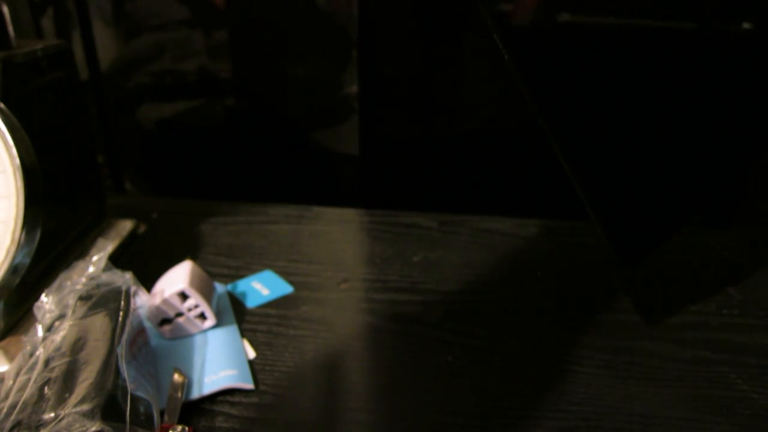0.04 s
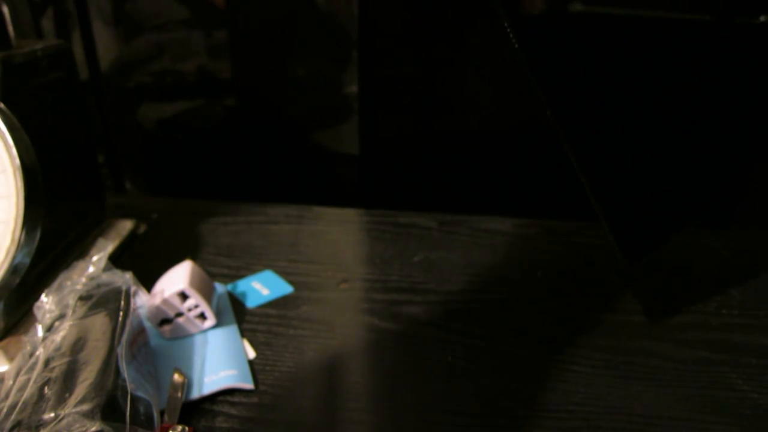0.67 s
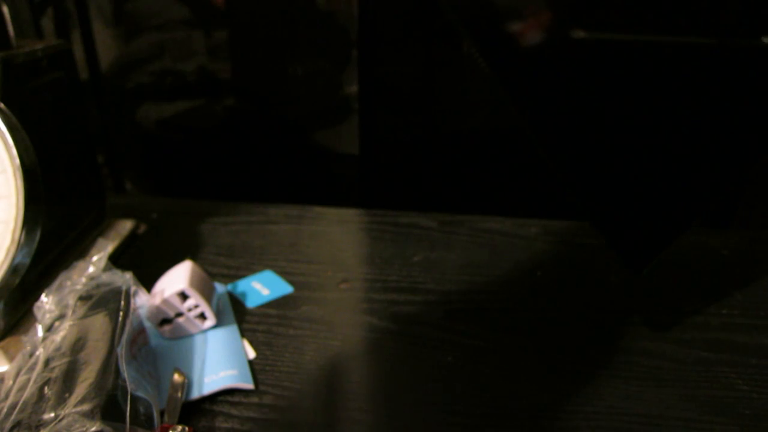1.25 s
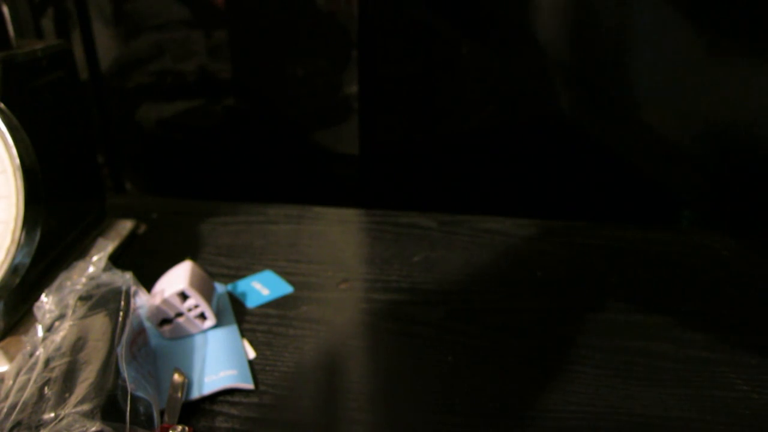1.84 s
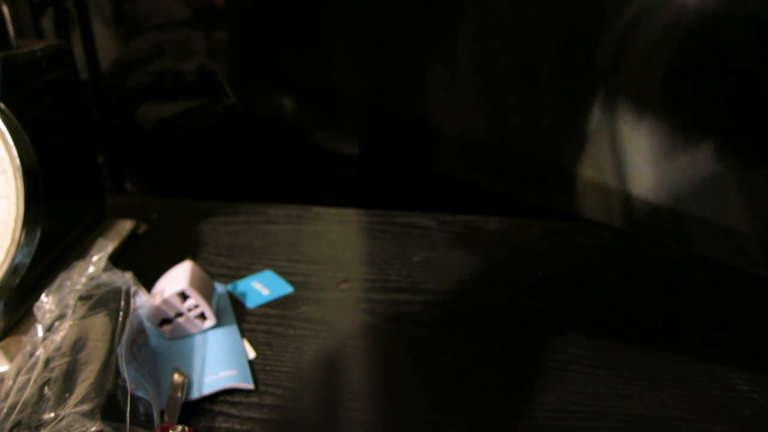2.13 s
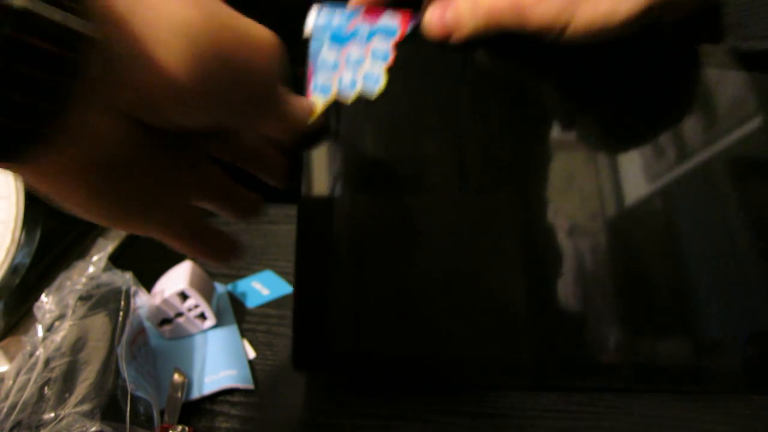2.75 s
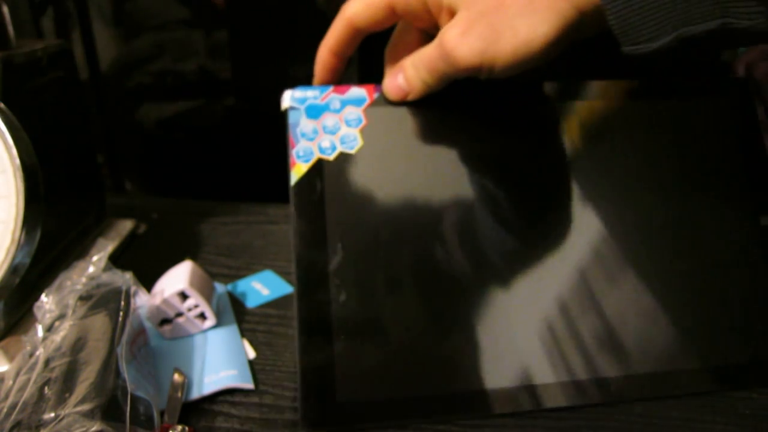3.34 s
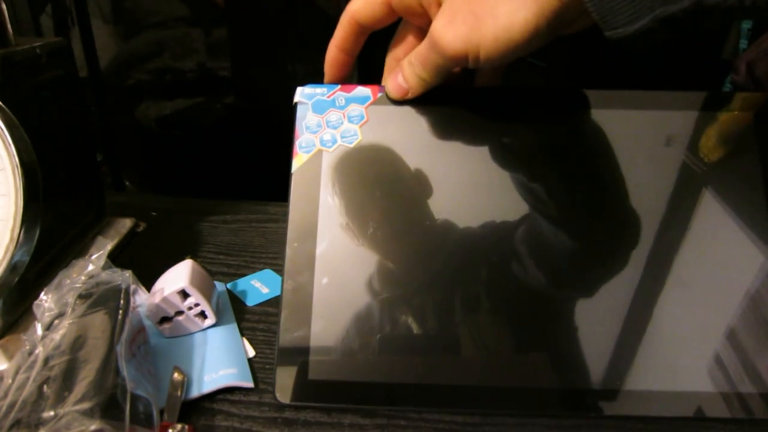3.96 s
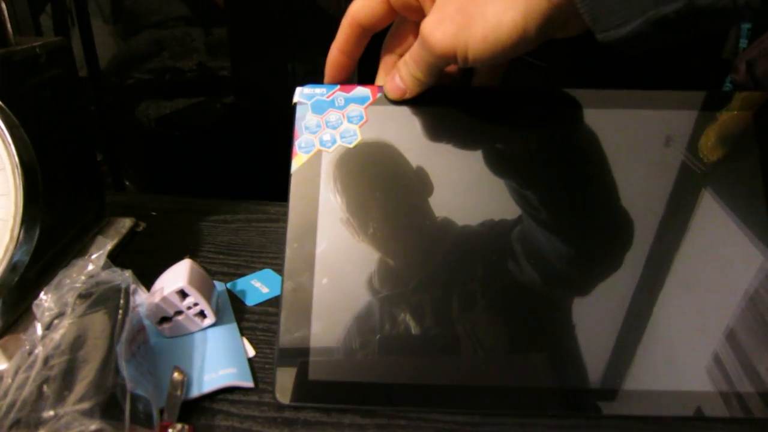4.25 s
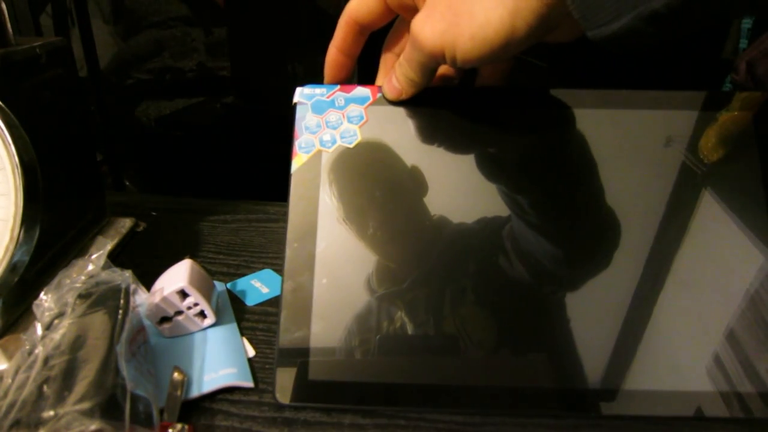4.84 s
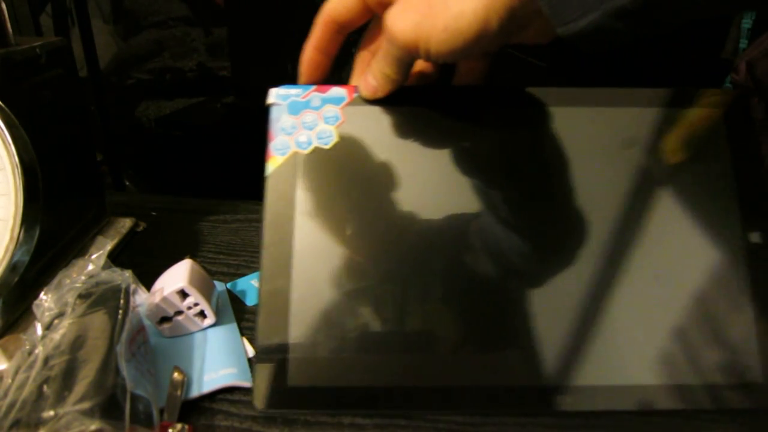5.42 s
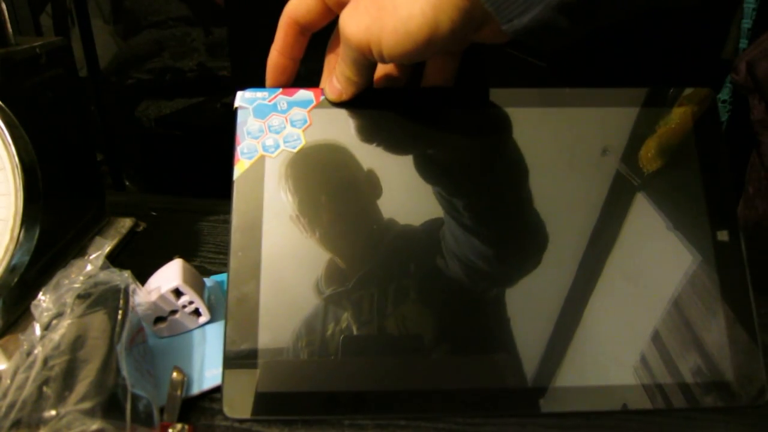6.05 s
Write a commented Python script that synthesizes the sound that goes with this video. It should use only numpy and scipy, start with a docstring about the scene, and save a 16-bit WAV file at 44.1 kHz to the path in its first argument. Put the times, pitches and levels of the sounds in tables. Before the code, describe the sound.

A tablet knocks down heavily on a wooden table, then is rocked and dragged with clacks and short scrapes in a quiet room.

```python
"""A tablet knocks down heavily on its edge on a wooden table, is dragged round and rocked, then slid again.
Each knock thuds in the table top and clacks in the shell; the heavy ones set small loose metal clinking. The
sliding edge sticks and slips on the grain, so the shell scrapes, the wood rumbles and grit hisses. Fingers tick
and rub on the shell and a sleeve brushes past, all close up in a small, quiet room."""
import sys
import numpy as np
from scipy import signal
from scipy.fft import rfft, irfft, next_fast_len
from scipy.io import wavfile
from scipy.ndimage import map_coordinates

SR = 44100
rng = np.random.default_rng(int(sys.argv[2]) if len(sys.argv) > 2 else 0)


def bounce(signal):
    """Save signal as a 16-bit WAV file at the path given by the first command-line argument."""
    frames = np.transpose(np.atleast_2d(signal))
    limited = np.clip(frames, -1, 1)
    pcm = np.round(limited * 32767).astype(np.int16)
    wavfile.write(sys.argv[1], SR, pcm)


N = 268569
RING = np.arange(SR // 2) / SR  # seconds after a contact

# The table top's modes. Each row: frequency in Hz, level in dB, ring time (t60) in seconds.
WOOD_MODES = [(113.4, -3, 0.32), (146, -.5, 0.21), (188, -5.5, 0.32), (237.3, -3.5, 0.21), (270, -7, 0.19),
              (306.6, -7.5, 0.2), (344.8, -5.5, 0.25), (374.2, -6, 0.21), (456, -24, 0.44),
              (514, -13.5, 0.052), (530, -2.5, 0.19), (654, -5, 0.061), (689, -6, 0.19), (837, -11.5, 0.27)]
# The tone of the struck shell. Each row: frequency in Hz, level in dB.
CLACK_EQ = [(200, -3), (500, 2.5), (850, 2), (1250, -2), (1650, -9), (1860, -2), (2500, -12), (3200, -23),
            (6000, -44), (16000, -60)]
# The stereo image of close sounds. Each row: frequency in Hz, left-right likeness (1 is mono).
CLOSE_IMAGE = [(150, 0.98), (600, 1), (1200, 0.96), (2400, 0.93), (4000, 0.83), (8000, 0.78), (13000, 0.23)]


def knocks():
    """The edge knocks the table, landing or catching as it is dragged, and the wood thuds; harder knocks add
    more tock, shell clack and buzzing crack."""
    # Each row: start in seconds, thud level in dB, thud centre in Hz, hardness (clack over thud) in dB.
    blows = [(2.732, -10.5, 159, -17), (2.914, -10, 219, -12), (2.928, -9.5, 127, -26),
             (3.134, -25.5, 249, -12), (3.218, -29.5, 233, -11), (3.345, -32, 280, -16),
             (3.4, -20, 512, -2.5), (3.449, -15.5, 484, -15), (3.546, -20.5, 162, -21),
             (3.557, -21.5, 540, -11.5), (3.581, -26, 539, -12), (3.687, -23.5, 350, -8.5),
             (3.708, -20.5, 362, -0.5), (3.74, -19.5, 545, -9), (3.925, -18.5, 282, -16),
             (4.141, -24, 244, -21), (4.166, -35.5, 243, -26), (4.319, -23, 258, -16.5),
             (4.485, -35.5, 258, -17), (5.097, -41, 137, -27), (5.298, -32, 148, -15.5),
             (5.425, -22.5, 515, -9), (5.461, -21.5, 391, -12.5), (5.502, -26, 490, -10),
             (5.599, -36.5, 136, -14), (5.907, -35.5, 280, -15.5)]
    # The tones of the woody tock and the edge's crack. Each row: frequency in Hz, level in dB.
    tock_eq = [(120, -26), (250, -21), (370, 11.5), (520, -6.5), (700, -6), (900, -17), (1300, -12.5),
               (4000, -49)]
    crack_eq = [(500, 0), (2500, 17), (4000, 3.5), (5200, 9.5), (7000, -5), (11000, -13.5), (16000, -28)]
    out = np.zeros((2, N))
    for start, db, centre_hz, hard_db in blows:
        wood = thud(centre_hz)
        tock = burst(tock_eq, attack=0.0033, t60=0.043, tail_db=-17, tail_t60=0.31)
        clack = burst(CLACK_EQ, attack=0.00068, t60=0.17, tail_db=-0.5, tail_t60=0.46)
        crack = click(crack_eq)
        buzz = amp(-2) * burst(crack_eq, attack=0.0007, t60=0.052, tail_db=1, tail_t60=0.29)
        tock_db, crack_db = -0.5 + 0.61 * hard_db, -8 + 1.3 * hard_db
        hit = wood + amp(tock_db) * tock + amp(hard_db) * clack + amp(crack_db) * (crack + buzz)
        add(out, start, amp(db) * hit)
    return out


def thud(centre_hz):
    """The table top gives under the blow and rings in the modes around the contact's own pitch."""
    reach_octaves, scatter_db, attack_s, settle_s = 0.78, 3.5, 0.0008, 0.33
    hz, db, t60 = np.transpose(WOOD_MODES)[:, :, None]
    reach = 1 / np.sqrt(1 + (np.log2(hz / centre_hz) / reach_octaves) ** 2)
    reach += amp(-12) * (hz[0] / hz) ** 5  # every blow also rocks the top in its lowest modes
    polarity = (-1) ** np.arange(len(hz))[:, None]
    gains = polarity * reach * amp(db + scatter_db * rng.standard_normal(hz.shape))
    ring = np.sum(gains * decay(t60) * np.sin(2 * np.pi * hz * RING), axis=0)
    damping = 1 - 0.23 * (1 - np.exp(-(RING / settle_s) ** 2))  # the resting edge soaks up some ring
    punch = amp(8) * decay(t60=0.1) * np.sin(2 * np.pi * centre_hz * RING)
    return unit_hit((ring * damping + punch) * (1 - np.exp(-RING / attack_s)))


def drags():
    """The sliding edge shakes the shell and the table; grit hisses at the contact."""
    # The modes of the shell and glass. Each row: frequency in Hz, width in Hz, level in dB.
    shell_modes = [(374, 110, -8), (454, 67, 3), (509, 101, 1), (635, 10.4, -0.5), (772, 20, -13),
                   (929, 61, -8.5), (1100, 45, -18.5), (1213, 50, -13.5), (1375, 35, -10),
                   (1534, 48, -12.5), (1843, 107, -10), (2080, 36, -18.5), (2185, 14, -12.5),
                   (2430, 13, -8), (2487, 95, -20.5), (3590, 24, -25), (4190, 20.6, -28), (5200, 69, -22.5),
                   (5700, 53, -27)]
    # The tone of the grit. Each row: frequency in Hz, level in dB.
    grit_eq = [(1650, -15), (2800, -6), (5440, -7.5), (5890, -9.5), (6970, -9), (9820, -13), (11300, -11.5),
               (14700, -25), (16000, -45)]
    pressed_modes = [(hz, 5 / t60, db) for hz, db, t60 in WOOD_MODES]  # the edge damps and widens them

    def shell_response(f):
        """The small shell resonates but radiates no bass."""
        return resonances(shell_modes, f) / np.sqrt(1 + (300 / (f + 1)) ** 6)

    def wood_response(f):
        """The pressed top resonates, rolled off below 110 Hz and above 250 Hz."""
        return resonances(pressed_modes, f) * 1j * f / (110 + 1j * f) / (1 + 1j * f / 250)

    ridges = unit(amp(1.9 * wobble(rate=90)))  # chatter over the wood grain
    friction = ridges * stick_slip(rate=1400, smooth=0.96)
    dust = stick_slip(rate=650, smooth=1.0)  # single specks under the edge
    scrape = unit(filtered(friction, shell_response))
    rumble = unit(filtered(friction, wood_response))
    grit = unit(equalised(friction + 0.65 * dust, grit_eq))
    scrape_gain, rumble_gain, grit_gain = push_envelopes()
    return scrape_gain * scrape + rumble_gain * rumble + grit_gain * grit


def push_envelopes():
    """Scrape, rumble and grit swell with each push's speed; rumble holds up best as the edge slows."""
    # Each row: start in seconds, speeding up in seconds, slowing down in seconds, peak scrape in dB,
    # then rumble and grit in dB relative to that peak.
    pushes = [(3.124, 0.021, 0.17, -40.5, 9.5, -11), (3.4, .018, .19, -28.5, -6.5, -14),
              (3.531, 0.044, 0.082, -25, -10, -21.5), (3.6, 0.056, 0.064, -31.5, -9, -13),
              (3.704, 0.03, 0.078, -18.5, -3, -15), (5.2, 0.18, 0.18, -39, -3, -18),
              (5.39, 0.092, 0.25, -26.5, -15, -14)]
    swell_db, roundness = 26, 1.48
    gains = np.zeros((3, N))
    for start, rise, fall, db, rumble_db, grit_db in pushes:
        t = np.arange(N) / SR - start
        from_peak = np.interp(t, [0, rise, rise + fall], [0.44, 0, 1])  # the edge breaks loose at speed
        speed_db = -swell_db * from_peak ** roundness
        levels = db + np.array([speed_db, rumble_db + 0.55 * speed_db, grit_db + 0.85 * speed_db])
        gains = np.maximum(gains, amp(levels) * gate(t, rise + fall, attack=0.0035, release=0.0088))
    return gains


def stick_slip(rate, smooth):
    """Tiny uneven jerks at random moments, about rate a second, over a bed of smooth friction."""
    jerks = (rng.random(N) < rate / SR) * rng.standard_normal((2, N))
    bed = smooth * rng.standard_normal((2, N))
    return unit(stereo(unit(jerks) + bed, CLOSE_IMAGE))


def taps():
    """Light contacts move only the shell; a nail snaps brighter than a fingertip, then scuffs."""
    # Each row: start in seconds, clack level in dB, snap level in dB, snap tilt in dB per octave.
    touches = [(0.025, -42.5, -44.5, -0.5), (1.570, -40, -43, 5), (1.591, -42.5, -46, 21),
               (1.617, -50, -44.5, -4), (2.245, -48.5, -48.5, -1), (2.338, -51, -53, 0),
               (2.556, -69, -47, 5), (3.976, -43, -60, 4), (4.063, -39, -39, 1), (4.428, -42, -52, -8.5),
               (4.761, -40, -51, -8), (4.917, -45.5, -66, -15)]
    # The snap's tone before the tilt. Each row: frequency in Hz, level in dB.
    snap_eq = [(300, -27), (800, 3.5), (2500, 9), (5000, 12), (8000, 4.5), (11000, 4), (16000, -27)]
    out = np.zeros((2, N))
    for start, clack_db, snap_db, tilt in touches:
        tilted_eq = [(hz, db + tilt * np.log2(hz)) for hz, db in snap_eq]
        clack = burst(CLACK_EQ, attack=0.00045, t60=0.029, tail_db=-9, tail_t60=0.12)
        scuff = amp(-6.5) * burst(tilted_eq, attack=0.002, t60=0.018, tail_db=-20, tail_t60=0.22)
        add(out, start, amp(clack_db) * clack + amp(snap_db) * (click(tilted_eq) + scuff))
    return out


def clinks():
    """Small loose metal jumps with the heavy knocks, rings thinly and rattles as it settles."""
    # Each row: start in seconds, ring level in dB.
    jumps = [(2.765, -50.5), (2.915, -48), (2.975, -49), (2.983, -50.5)]
    # The metal's modes. Each row: frequency in Hz, level in dB, ring time (t60) in seconds.
    metal_modes = [(3380, -1, 0.33), (4700, 2, .42), (5150, -1, .25), (5980, -6, .2), (6720, 3, .2),
                   (7150, -6, .06), (7800, 1, .07), (8650, 0, .087), (11100, -9, .06)]
    # The rattle's tone. Each row: frequency in Hz, level in dB.
    rattle_eq = [(2000, -20), (5000, 1.5), (7500, 1), (11000, -7), (16000, -27)]
    hz, mode_db, t60 = np.transpose(metal_modes)[:, :, None]
    out = np.zeros((2, N))
    for start, db in jumps:
        phase = rng.uniform(0, 2 * np.pi, hz.shape)
        spread = 0.47 * rng.standard_normal((2,) + hz.shape)  # phase offsets give stereo width
        gains = amp(mode_db + 2 * rng.standard_normal(hz.shape))
        partials = gains * decay(t60) * np.sin(2 * np.pi * hz * RING + phase + spread)
        ring = unit_hit(np.sum(partials, axis=1))
        rattle = amp(5) * burst(rattle_eq, attack=0.00061, t60=0.031, tail_db=-18, tail_t60=0.63)
        add(out, start, amp(db) * (ring + rattle))
    return out


def rubs():
    """A sleeve sweeps past and fingers slide on the shell."""
    # Each row: start in seconds, length in seconds, level in dB.
    sleeve_sweeps = [(.45, .15, -61), (1.387, .018, -53), (1.44, .035, -52.5), (1.877, 0.039, -54),
                     (1.965, 0.094, -48.5), (2.24, 0.21, -52), (2.472, .004, -45)]
    finger_slides = [(1.576, .025, -41.5), (2.265, 0.075, -48), (2.775, 0.086, -47), (3.895, 0.062, -53),
                     (4.12, 0.12, -44)]
    # The tones of cloth and skin. Each row: frequency in Hz, level in dB.
    cloth_eq = [(300, 2), (1500, 2), (3000, -0.5), (5300, 6.5), (7000, 3), (9500, 4), (11500, 7),
                (13200, 1), (14500, -10), (16000, -4)]
    skin_eq = [(200, 7), (700, 0), (1800, -3), (2750, 2.5), (3600, -9.5), (4500, 0.5), (5250, 1),
               (6200, -5), (8500, -4), (10000, -12), (11700, -5), (14000, -22), (16000, -23)]
    sleeve = brush(sleeve_sweeps, cloth_eq, rough_db=2.8, catch_rate=1510, smooth=1.9)
    fingers = brush(finger_slides, skin_eq, rough_db=4.3, catch_rate=1220, smooth=0.88)
    return sleeve + fingers


def brush(strokes, eq, rough_db, catch_rate, smooth):
    """Skin or cloth slides in an uneven hiss of tiny catches; each stroke starts briskly, then weakens."""
    sag_db = 5
    envelope = np.zeros(N)
    for start, length, db in strokes:
        t = np.arange(N) / SR - start
        progress = np.clip(t / length, 0, 1)
        envelope += amp(db - sag_db * progress) * gate(t, length, attack=0.01, release=0.021)
    hiss = equalised(stick_slip(catch_rate, smooth), eq)
    flutter = amp(rough_db * wobble(rate=220))
    return envelope * unit(flutter * hiss)


def room(x):
    """The walls answer after 10 ms, each frequency dying at its own speed."""
    # The reverb's decay. Each row: frequency in Hz, t60 in seconds.
    decay_times = [(100, 0.59), (500, 0.4), (2500, 0.11), (12000, 0.73)]
    # The reverb's stereo image. Each row: frequency in Hz, left-right likeness.
    room_image = [(100, 1), (500, 1), (1200, 0.33), (5000, 0.13)]
    hz, t, bands = signal.stft(rng.standard_normal((2, SR // 2)), SR, nperseg=256)
    bands *= amp(-60 * t / along(decay_times, hz)[:, None])
    tail = stereo(signal.istft(bands, SR, nperseg=256)[1], room_image)
    delayed = np.pad(x, ((0, 0), (SR // 100, 0)))
    return signal.fftconvolve(delayed, tail / np.linalg.norm(tail[0]), axes=1)[:, :N]


def air():
    """Room tone: a steady rush whose lows are largely opposed in the two channels."""
    # The tone of the rush. Each row: frequency in Hz, level in dB.
    air_eq = [(12, -59), (20, -29), (42, -7), (74, -10), (95, 0.5), (203, -4.5), (554, -9.5), (603, -9),
              (733, -11.5), (1250, -9), (1350, -15), (1470, -13.5), (2800, -20), (7230, -23),
              (15800, -34.5)]
    # Its width. Each row: frequency in Hz, side over mid in dB.
    side_eq = [(60, 5), (110, 4.5), (200, 7), (380, 7), (700, 6), (1290, 2.5), (2380, 4.5), (4400, -1),
               (8120, -2), (15000, -1.5)]
    mid, side = equalised(rng.standard_normal((2, N)), air_eq)
    mid, side = unit(mid), equalised(unit(side), side_eq)
    return np.array([mid + side, mid - side])


def burst(eq, attack, t60, tail_db, tail_t60):
    """Dense modes struck at once: a fast decay plus a longer ring (times in seconds)."""
    fade = decay(t60) + amp(tail_db) * decay(tail_t60)
    return unit_hit(contact_noise(eq) * fade * (1 - np.exp(-RING / attack)))


def click(eq):
    """The first hard touch, over in a few milliseconds."""
    return unit_hit(contact_noise(eq) * decay(t60=0.014))


def contact_noise(eq):
    """Half a second of close, coloured stereo noise at rms 1."""
    white = stereo(rng.standard_normal((2, len(RING))), CLOSE_IMAGE)
    return unit(equalised(white, eq))


def resonances(modes, f):
    """Causal response of (Hz, width in Hz, dB) peaks of alternating polarity."""
    return sum((-1) ** k * amp(db) * 1j * f * width / (hz * hz - f * f + 1j * f * width)
               for k, (hz, width, db) in enumerate(modes))


def stereo(pair, image):
    """Two unrelated signals become left and right of the given likeness."""
    angle = lambda hz: np.arccos(np.clip(along(image, hz), -1, 1)) / 2
    mid, side = filtered(pair, lambda hz: np.array([np.cos(angle(hz)), np.sin(angle(hz))]))
    return np.array([mid + side, mid - side])


def filtered(x, response):
    """Multiply the spectrum of x by a function of frequency."""
    n = x.shape[-1]
    padded = next_fast_len(n + SR // 2)
    return irfft(rfft(x, padded) * response(np.fft.rfftfreq(padded, 1 / SR)), padded)[..., :n]


def equalised(x, eq):
    """Shape x with a curve of (Hz, dB) points."""
    return filtered(x, lambda hz: amp(along(eq, hz)))


def along(points, hz):
    """Interpolate (Hz, value) points on a log frequency axis."""
    freqs, values = np.transpose(points)
    return np.interp(np.log(hz + 1), np.log(freqs + 1), values)


def wobble(rate):
    """A smooth random curve, rate knots a second."""
    return map_coordinates(rng.standard_normal(int(N * rate / SR) + 4), [np.arange(N) * rate / SR])


def gate(t, length, attack, release):
    """Full gain from 0 to length seconds, fading in before and out after."""
    return np.exp(-(np.minimum(t, 0) / attack) ** 2 - (np.maximum(t - length, 0) / release) ** 2)


def decay(t60):
    """A fade that falls 60 dB in t60 seconds."""
    return amp(-60 * RING / t60)


def amp(db):
    """Decibels to gain."""
    return 10 ** (np.asarray(db) / 20)


def unit(x):
    """Scale to rms 1."""
    return x / np.sqrt(np.mean(x ** 2) + 1e-20)


def unit_hit(x):
    """Scale to the energy of 10 ms at rms 1."""
    return x / np.sqrt(np.mean(np.sum(x ** 2, axis=-1)) / (SR / 100))


def add(track, start, sound):
    """Mix a hit in at start seconds."""
    part = track[:, round(start * SR):][:, :len(RING)]
    part += sound[..., :part.shape[1]]


def scene():
    """The close handling, its reverb and faint room tone."""
    handling = rubs() + knocks() + taps() + clinks() + drags()
    return handling + amp(-11) * room(handling) + amp(-52.5) * air()


def record(dry):
    """The microphone thins the deep bass and keeps nothing above its band limit."""
    low_cut_hz, top_hz = 55, 15800
    thinned = signal.sosfilt(signal.butter(5, low_cut_hz, "highpass", fs=SR, output="sos"), dry)
    return filtered(thinned, lambda hz: hz < top_hz)


dry = scene()
out = record(dry)
bounce(out)
```